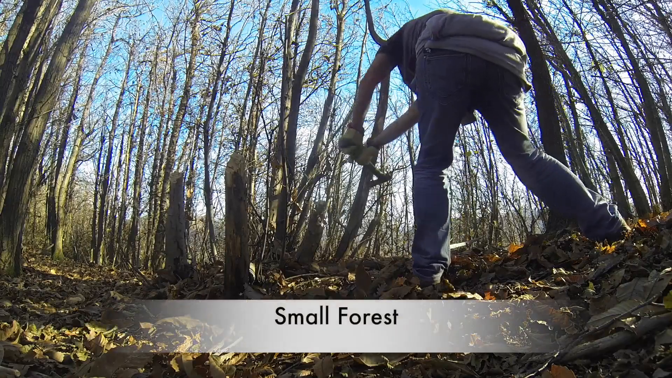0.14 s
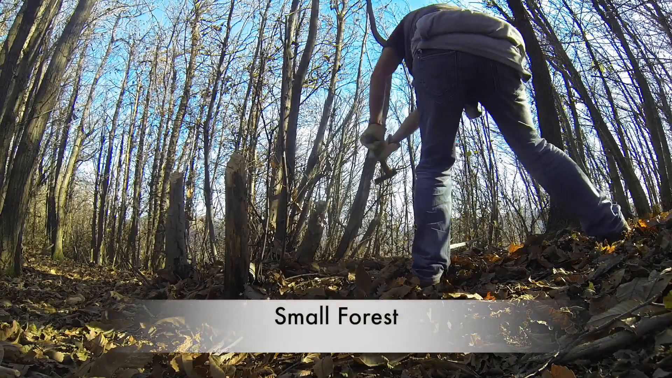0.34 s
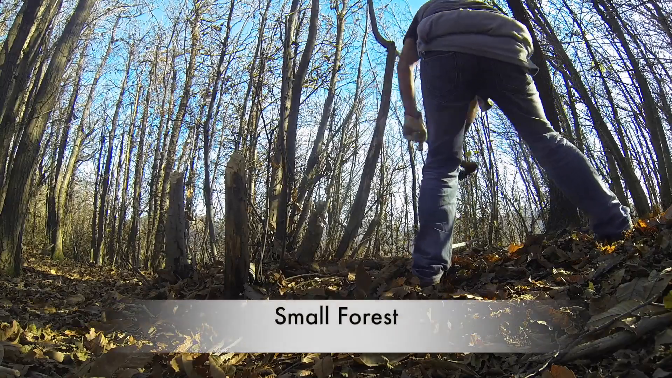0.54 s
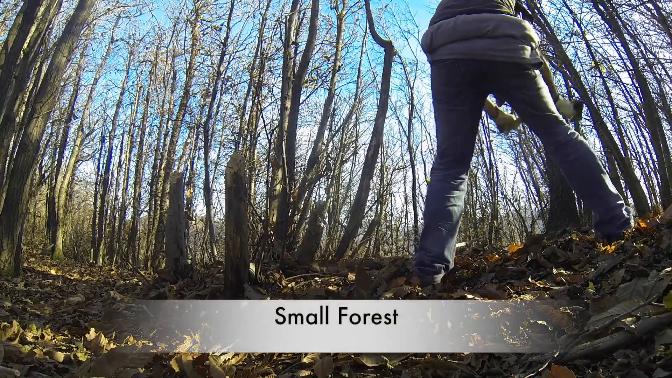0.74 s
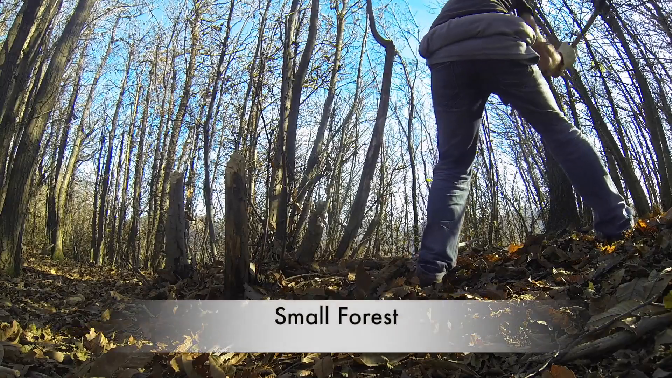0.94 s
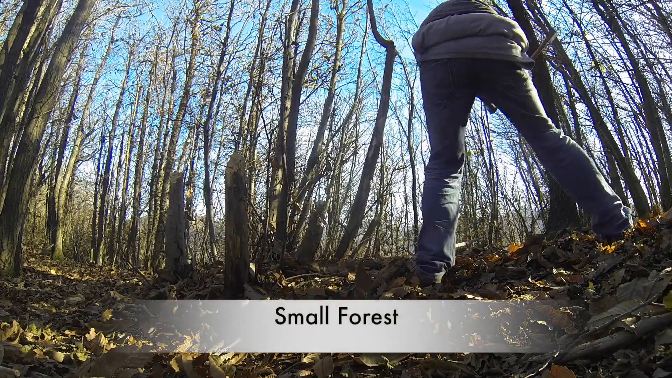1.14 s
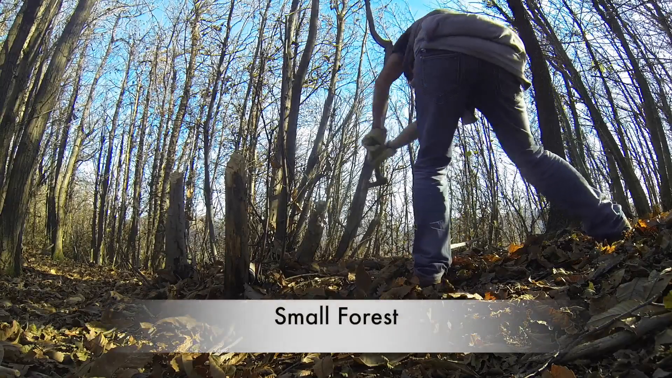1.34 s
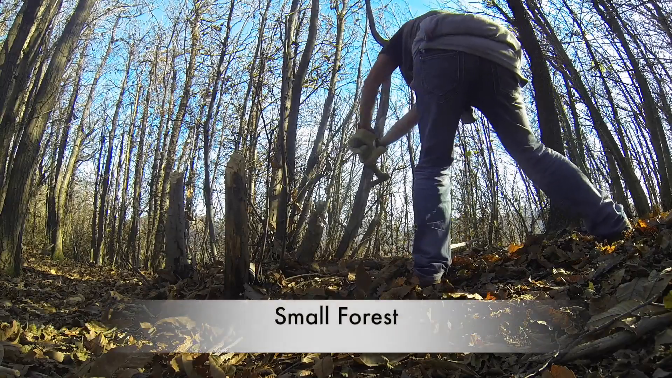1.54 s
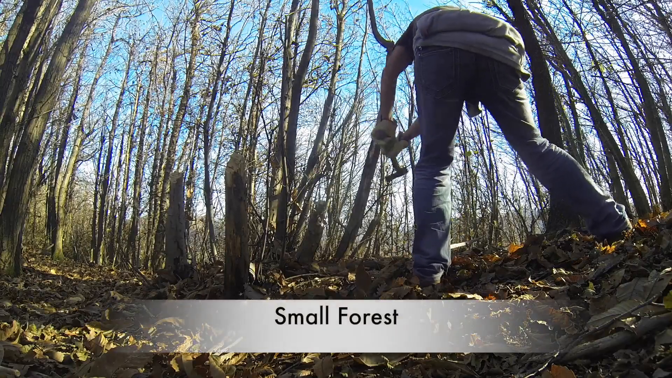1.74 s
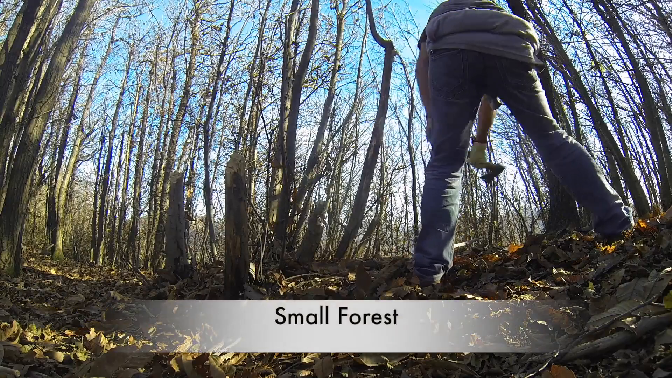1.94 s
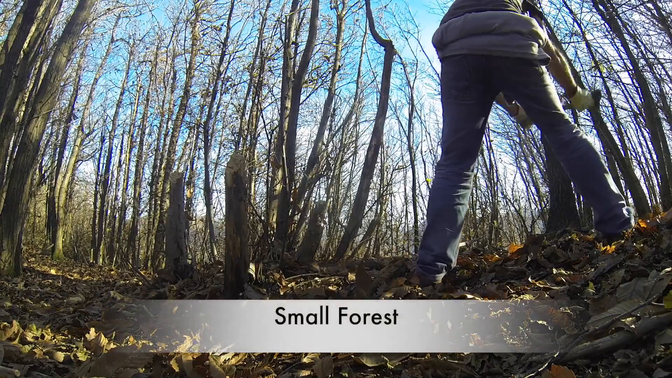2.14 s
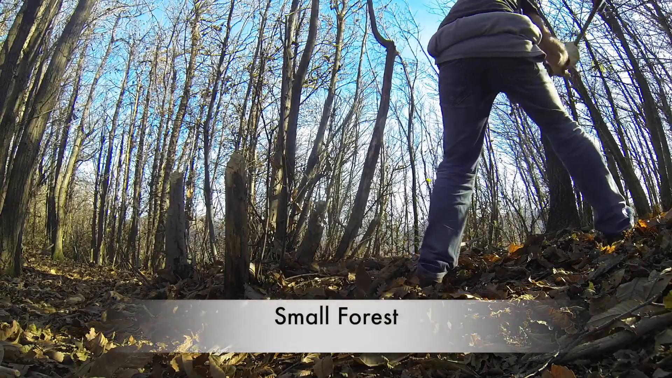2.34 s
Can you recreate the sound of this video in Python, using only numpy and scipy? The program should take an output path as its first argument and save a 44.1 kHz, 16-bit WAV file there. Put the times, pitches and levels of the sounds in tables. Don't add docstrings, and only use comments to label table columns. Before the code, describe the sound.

An axe strikes a log twice, just over a second apart: sharp woody crack, deep thump, quick rebound and short grainy echo from trunks. Dry leaves rustle softly between blows; close small microphone, faint hiss and rumble.

```python
import sys
import numpy as np
from scipy import signal
from scipy.fft import rfft, irfft, next_fast_len
from scipy.io import wavfile
from scipy.ndimage import uniform_filter1d, map_coordinates

SR = 44100
rng = np.random.default_rng(int(sys.argv[2]) if len(sys.argv) > 2 else 0)


def master(y):
    cut = np.clip(np.atleast_2d(y).T, -1, 1)
    pcm = np.round(cut * 32767)
    wavfile.write(sys.argv[1], SR, pcm.astype(np.int16))


def level_to_linear(level):
    exponent = np.asarray(level, float) / 20
    return 10 ** exponent


N = 105840

# (frequency [Hz], level [dB])
AIR_COLOUR = [(12, -32.5), (20, -0.5), (65, -3.5), (234, -14), (542, -31), (780, -31.5), (1400, -35.5),
              (9140, -46), (14300, -46), (16000, -53)]
# (time [s], level [dB])
LEAF_STIR = [(0, -68.5), (.17, -66.5), (.34, -56.5), (.42, -58), (.46, -56.5), (.58, -59), (.68, -53.5),
             (.8, -59.5), (.9, -63), (1.06, -62), (1.13, -73), (1.38, -66), (1.5, -67), (1.72, -58.5),
             (1.82, -62.5), (1.88, -59), (2.05, -57), (2.4, -69.5)]
# (frequency [Hz], level [dB])
LEAF_COLOUR = [(180, -32), (300, 2.5), (631, -7.5), (1260, -4.5), (1490, -18), (1730, -9), (7880, -13.5),
               (10100, -13), (15500, -48)]
# (time [s], level [dB], pitch [Hz], time to fall 60 dB [s])
FLICKS = [(.743, -53, 1230, 0.025), (.866, -54.5, 2420, .02), (.868, -52, 1570, .02), (1.0, -55, 2700, .02),
          (1.033, -54, 2400, .02), (1.105, -54, 1000, .05), (1.272, -51, 1200, 0.013),
          (1.272, -51, 7000, 0.017), (1.857, -46, 2000, .025), (1.858, -50, 1255, .04),
          (1.876, -43.5, 2520, .025), (1.878, -51, 1200, .03), (1.906, -48, 2150, .025),
          (2.005, -52.5, 4100, .015), (2.022, -47, 2090, .02), (2.069, -48, 5840, .015),
          (2.104, -41.5, 2890, .015), (2.133, -49.5, 400, 0.028), (2.196, -48, 1693, 0.02),
          (2.214, -50.5, 2240, 0.021), (2.216, -51, 1290, .025), (2.233, -49, 2800, 0.018),
          (2.232, -49.5, 382, .025), (2.284, -44, 3260, 0.0091), (2.326, -50, 3000, 0.022)]
# (time [s], level [dB], pitch [Hz],
# length [s])
DRY_TICKS = [(0.2132, -18, 7400, 0.00083), (0.323, -32.5, 8040, .008), (.296, -35, 600, .01),
             (.667, -42.5, 1280, 0.011), (.63, -44.5, 900, .008), (0.423, -37, 8500, .002),
             (0.4445, -37.5, 2660, .006), (0.554, -43.5, 6000, 0.0048), (0.625, -43.5, 2490, 0.011),
             (.634, -41.5, 8000, 0.0057), (.664, -35.5, 5600, .014), (.745, -45, 7000, .003),
             (.866, -46.5, 3010, 0.0042), (.944, -45.5, 6750, 0.005), (1.05, -48, 8600, 0.0097),
             (.36, -43, 2500, 0.011), (.77, -44, 1490, 0.0046), (1.066, -43, 5040, 0.005),
             (1.955, -46, 6040, 0.0037), (.458, -45.5, 9000, 0.0056), (.5, -48.5, 7500, .01),
             (1.74, -41.5, 3000, .01), (.985, -46, 9050, 0.0031), (1.079, -42.5, 7480, 0.0053),
             (1.2714, -48.5, 2000, 0.0038), (1.5115, -38, 1800, 0.0015), (1.533, -25, 6800, .001),
             (1.622, -31, 1490, 0.011), (1.722, -43, 6970, .003), (1.749, -40.5, 7300, .003),
             (1.836, -45, 7800, .008), (1.864, -43.5, 2640, 0.036), (1.946, -46, 9050, 0.0032),
             (1.998, -46, 6230, .012), (2.021, -40, 3020, 0.013), (2.1016, -35.5, 5400, 0.0035),
             (2.136, -46.5, 1800, 0.0017), (2.228, -46, 1464, .004), (2.281, -45.5, 4490, 0.0017),
             (2.321, -48.5, 2610, 0.0074)]
# (pitch [Hz], level [dB], time to fall 60 dB [s])
TWIG_TONES = [(3120, -40, 0.013), (4250, -34, 0.013), (4900, -35.5, 0.011), (7760, -40, 0.014),
              (8500, -41.5, 0.018), (9700, -43, 0.011), (12000, -44, .006)]
# (time [s], level [dB])
HANDLE_KNOCKS = [
    (1.0655, -39.5),
    (1.0774, -39.5),
    (1.087, -53),
]
# (pitch [Hz], level [dB], time to fall 60 dB [s])
HANDLE_TONES = [(323, -1, 0.039), (600, -6, .02), (900, 2.5, 0.026), (1200, -5.5, 0.022), (1450, -1, .022),
                (1700, -2.5, 0.029), (2210, -8, .015), (2700, 0.5, 0.015)]
# (time [s], thump level [dB], rebound level [dB])
AXE_BLOWS = [
    (0.1896, 0.23, -12.5),
    (1.518, 0.2, -12),
]
# (delay [s], pitch [Hz], level [dB], time to fall 60 dB [s])
EDGE_TONES = [
    [(-.0006, 1900, 5, 0.0096), (0.002, 3000, -7, .012), (0.0022, 8075, -2.5, 0.0046),
     (0.0014, 9000, -8.5, 0.0069), (.003, 1210, -3.5, .032), (0.0043, 5900, -17, 0.013),
     (.004, 600, -24, 0.049), (0.002, 4400, -23, 0.029), (.004, 870, -18, 0.024), (-.0006, 2250, -9, .01),
     (.003, 1030, -11.5, 0.031)],
    [(0, 2000, -4, .011), (.001, 3036, -1.5, 0.0097), (.001, 3606, -9.5, 0.012),
     (.001, 6900, -13.5, 0.0091), (.0012, 8950, -14.5, .01), (.002, 1084, -11, 0.026),
     (.003, 600, -21, 0.085), (.0005, 2300, -5, .012), (.002, 811, -12, .025), (.002, 1324, -18, 0.04),
     (.001, 4760, -14, .01), (.002, 487, -16, .03), (.002, 950, -17.5, 0.017)],
]
SPLINTER_DB = [-10.5, -10]
# (frequency [Hz], level [dB])
FIRST_SPLINTER_COLOUR = [(240, -36), (400, -10.5), (697, -9.5), (1140, -12), (3120, -13), (5350, -21),
                         (7870, -15), (9920, -17), (16000, -47)]
SECOND_SPLINTER_COLOUR = [(240, -30), (500, 0), (1100, -9.5), (3100, -6), (4600, -15.5), (7500, -14.5),
                          (11000, -21), (16000, -39)]
LOG_PITCHES = [66, 98, 118, 135, 158, 222, 246, 330, 410]
LOG_DELAYS = [.0025, .0076, .0048, .0046, .0029, .0057, .0038, .0036, .004]
# (level [dB], time to fall 60 dB [s])
LOG_TONES = [(-10.5, 0.24), (-14, .4), (-23, 0.35), (-5, 0.11), (-15, .3), (-10, .11), (-20.5, .22),
             (-11.5, .1), (-20, .1)]
SECOND_LOG_SHIFT = [-.6, -1.8, -2, 1.5, -.4, .6, -0.36, -1.1, -2.2]
# (time [s], level [dB], pitch [Hz], time to fall 60 dB [s])
LOG_ROCKS = [(0.284, -16, 96, .09), (.29, -24.5, 264, .13), (.34, -30.5, 160.4, 0.17),
             (1.578, -27, 207, 0.06), (1.62, -25, 236, .1), (1.6, -22, 146, .12), (0.329, -24.5, 94, 0.23),
             (0.361, -26, 87.7, 0.33), (0.411, -19.5, 89.7, 0.15), (.445, -24.5, 92, 0.086),
             (.506, -27, 45, 0.11), (1.655, -26, 90.5, 0.16), (1.685, -26, 96, 0.13),
             (1.718, -27, 95.3, .16), (1.762, -30.5, 85, 0.18), (1.81, -40, 84.5, 0.16)]
ECHO_DB = [-20.5, -22.5]
# (frequency [Hz], level [dB])
FIRST_ECHO_COLOUR = [(120, -28.5), (200, 0), (769, -23), (1170, -19), (1510, -23), (7350, -29),
                     (13400, -46), (15500, -66)]
SECOND_ECHO_COLOUR = [(120, -22), (200, 0.8), (700, -22), (1500, -23.5), (3200, -24), (5000, -29),
                      (7350, -25), (13400, -47), (15800, -58.5)]
# (frequency [Hz], time to fall 60 dB [s])
ECHO_T60 = [(200, .45), (500, .45), (1500, .5), (7000, 0.3), (13000, .28)]
ECHO_STRETCH = [.9, 1]


def unit(x):
    return x / np.sqrt(np.mean(x ** 2) + 1e-20)


def along(points, hz):
    f, v = np.transpose(points)
    return np.interp(np.log(hz + 1), np.log(f + 1), v)


def coloured(x, spectrum):
    size = next_fast_len(len(x) + 4096)
    gain = level_to_linear(along(spectrum, np.fft.rfftfreq(size, 1 / SR)))
    return irfft(rfft(x, size) * gain, size)[:len(x)]


def noise(length, spectrum):
    return unit(coloured(rng.standard_normal(length), spectrum))


def wobble(rate):
    knots = rng.standard_normal(int(N * rate / SR) + 4)
    return map_coordinates(knots, [np.arange(N) * rate / SR])


def since(s):
    t = np.arange(N) / SR - s
    return np.maximum(t, 0), t > 0


def ring(s, hz, db, t60, rise):
    t, on = since(s)
    swell = 1 - np.exp(-t / rise)
    return -level_to_linear(db - 60 * t / t60) * on * swell * np.sin(2 * np.pi * hz * t)


def dying(spectrum, t60s):
    hz, t, z = signal.stft(noise(SR, spectrum), SR, nperseg=256)
    fade = level_to_linear(-60 * t / along(t60s, hz)[:, None])
    return signal.istft(z * fade, SR, nperseg=256)[1][:SR]


def air():
    whine = level_to_linear(-78 + 1.5 * wobble(17)) * np.sin(2 * np.pi * 14050 * np.arange(N) / SR)
    hiss = level_to_linear(-48.5 + 1.5 * wobble(3)) * noise(N, AIR_COLOUR)
    return hiss + whine


def leaves():
    s, db = np.transpose(LEAF_STIR)
    stir_db = np.interp(np.arange(N) / SR, s, db) + 2.0 * wobble(25)
    flares = np.zeros(N)
    at, size = rng.random((160, 2)).T
    flares[(at * N).astype(int)] = -np.log(size)
    flares = np.convolve(flares, np.exp(-np.arange(SR // 100) / SR / .002))[:N]
    z = signal.stft(rng.standard_normal(N) * (1 + .6 * flares), nperseg=256)[2]
    patches = uniform_filter1d(rng.standard_normal(z.shape), size=10, axis=0)
    patches = uniform_filter1d(patches, size=8, axis=1)
    hiss = signal.istft(z * level_to_linear(2.3 * unit(patches)), nperseg=256)[1][:N]
    return level_to_linear(stir_db + 0.85) * unit(coloured(hiss, LEAF_COLOUR))


def flicks():
    return sum(ring(s, hz * detune, db, t60, 0.0011)
               for s, db, hz, t60 in FLICKS for detune in (.97, 1.04))


def crumple(hz, span):
    t = np.arange(SR // 10) / SR
    length = max(span, 1 / 1000)
    count = (30, 1)
    wait = 2 * length * rng.random(count) ** 2
    pitch = np.clip(hz * np.exp(.5 * rng.standard_normal(count)), 400, 11500)
    size = level_to_linear(2.2 * rng.standard_normal(count))
    age = np.maximum(t - wait, 0)
    fade = np.exp(-wait / length - age * pitch / 2.2)
    swell = 1 - np.exp(-age * pitch)
    rings = (size * fade * swell * np.sin(2 * np.pi * pitch * age)).sum(axis=0)
    crisp = [(f, along(LEAF_COLOUR, f) - min(4.5 * np.log2(f / hz) ** 2, 16))
             for f in np.geomspace(200, 16000, num=20)]
    puff = noise(len(t), crisp) * np.exp(-t / length) * (1 - np.exp(-t / (0.42 * length)))
    return rings * np.sqrt(length / .012) + level_to_linear(2.5) * puff


def ticks():
    out = np.zeros(N + SR)
    for s, db, hz, span in DRY_TICKS:
        tick = level_to_linear(db - 6.5) * crumple(hz, span)
        out[round(s * SR):][:len(tick)] += tick
    return out[:N]


def twig():
    return sum(ring(.77, hz, db, t60, 0.00048) for hz, db, t60 in TWIG_TONES)


def handle():
    return sum(ring(s, hz * rng.normal(1, 0.027), db + level + rng.normal(0, 1.3), t60, 0.00084)
               for s, db in HANDLE_KNOCKS for hz, level, t60 in HANDLE_TONES)


def rocking():
    return sum(ring(s, hz, db, t60, 0.009) for s, db, hz, t60 in LOG_ROCKS)


def trunks(s, db, colour, stretch):
    t60s = [(hz, t60 * stretch) for hz, t60 in ECHO_T60]
    echo = dying(colour, t60s) * level_to_linear(2.5 * wobble(160)[:SR])
    swell = 1 - np.exp(-np.arange(SR) / SR / .003)
    out = np.zeros(N + 2 * SR)
    out[round(s * SR):][:SR] = level_to_linear(db) * echo * swell
    return out[:N]


def thump(s, db, rebound_db, shifts):
    out = np.zeros(N)
    rise, rebound_s = 0.0018, .106
    for hz, delay, (level, t60), shift in zip(LOG_PITCHES, LOG_DELAYS, LOG_TONES, shifts):
        out += ring(s + delay, hz, db + level + shift, t60, rise)
        out += ring(s + rebound_s + delay * .5, hz * 1.05, rebound_db + level, 0.75 * t60, rise)
    return out


def splintering(s, db, colour):
    t, on = since(s)
    return on * level_to_linear(db - 60 * t / .03) * (1 - np.exp(-t / .001)) * noise(N, colour)


def bite(s, tones):
    return sum(ring(s + delay, hz, db, t60, 0.00046) for delay, hz, db, t60 in tones)


def axe():
    splinter_colours = [FIRST_SPLINTER_COLOUR, SECOND_SPLINTER_COLOUR]
    echo_colours = [FIRST_ECHO_COLOUR, SECOND_ECHO_COLOUR]
    log_shifts = [np.zeros(len(LOG_TONES)), SECOND_LOG_SHIFT]
    out = np.zeros(N)
    for i, (s, thump_db, rebound_db) in enumerate(AXE_BLOWS):
        out += bite(s, EDGE_TONES[i])
        out += splintering(s, SPLINTER_DB[i], splinter_colours[i])
        out += thump(s, thump_db, rebound_db, log_shifts[i])
        out += trunks(s, ECHO_DB[i], echo_colours[i], ECHO_STRETCH[i])
    ground = signal.butter(2, 50, "high", fs=SR, output="sos")
    return signal.sosfilt(ground, out) + rocking()


def scene():
    background = air() + leaves()
    small_sounds = flicks() + ticks() + twig() + handle()
    return (background + small_sounds + axe())[None]


def low_pass(x):
    return signal.sosfilt(signal.butter(12, 16520, fs=SR, output="sos"), x)


def record(dry):
    hz = np.fft.rfftfreq(2 * N, 1 / SR)
    port_hz, width_hz, low_hz = 7800, 2500, 35
    port = 1 + level_to_linear(1.5) * 1j * hz * width_hz / (port_hz ** 2 - hz ** 2 + 1j * hz * width_hz)
    low_cut = (1j * hz / (low_hz + 1j * hz)) ** 2
    x = irfft(rfft(dry, 2 * N) * port * low_cut)[:, :N]
    duck_db, hold_s, back_s = -5.5, .25, .12
    for s in np.transpose(AXE_BLOWS)[0]:
        t, on = since(s)
        release = np.exp(-(np.maximum(t - hold_s, 0) / back_s) ** 2)
        x = x * level_to_linear(duck_db * on * (1 - np.exp(-t / 0.015)) * release)
    x = x / (1 + np.abs(x / 1.1) ** 6) ** (1 / 6)
    x = signal.sosfilt(signal.butter(2, 13000, fs=SR, output="sos"), x)
    x = irfft(rfft(x, 2 * N) * (hz < 15900))[:, :N]
    return low_pass(x)


dry = scene()
out = record(dry)
master(out)
```